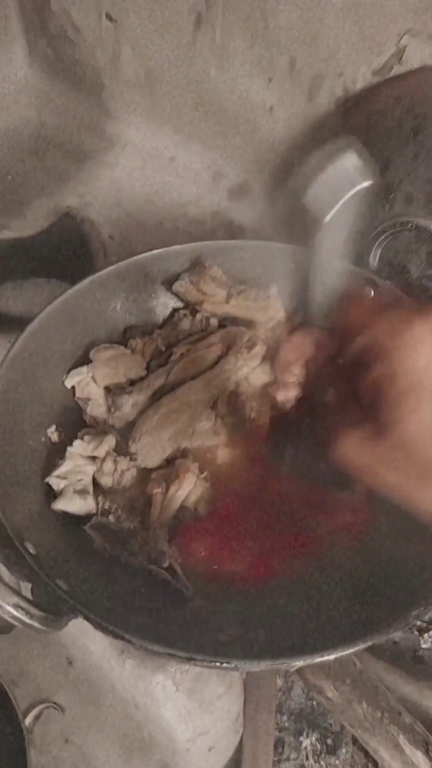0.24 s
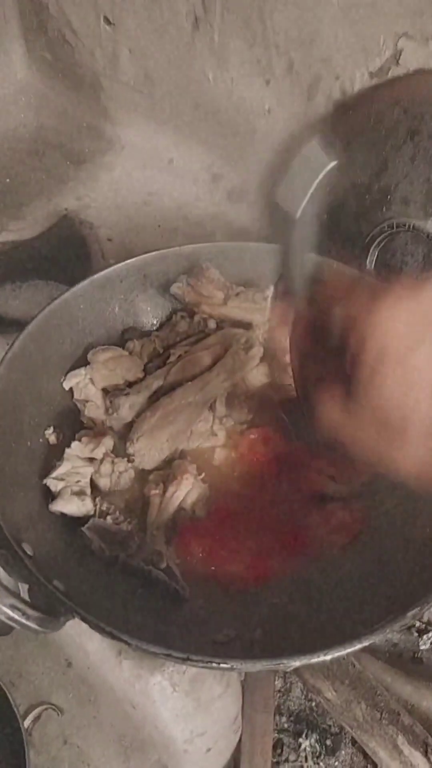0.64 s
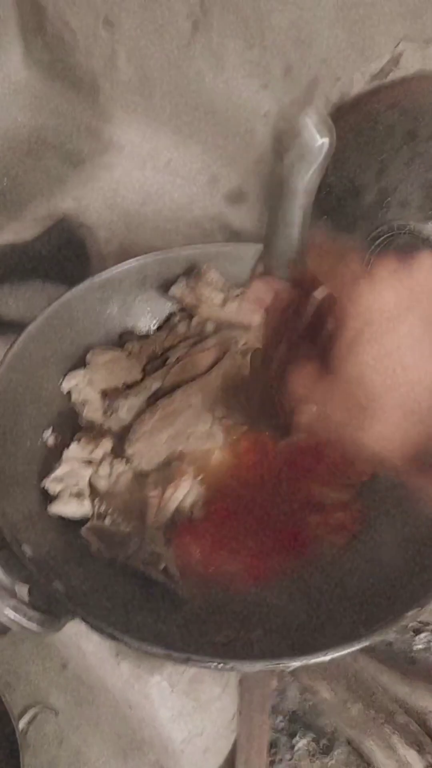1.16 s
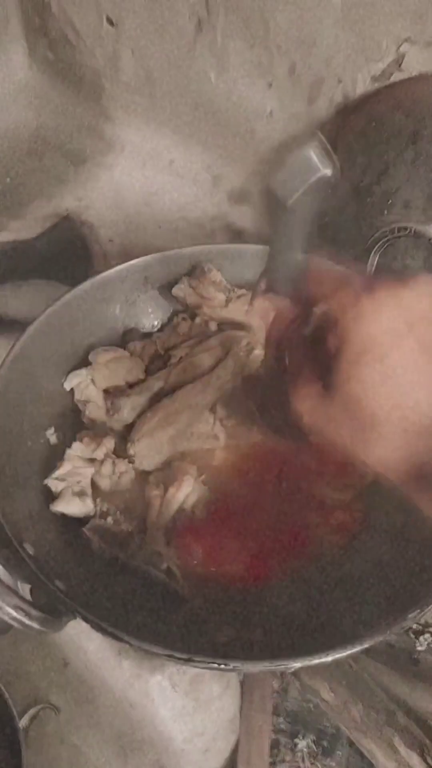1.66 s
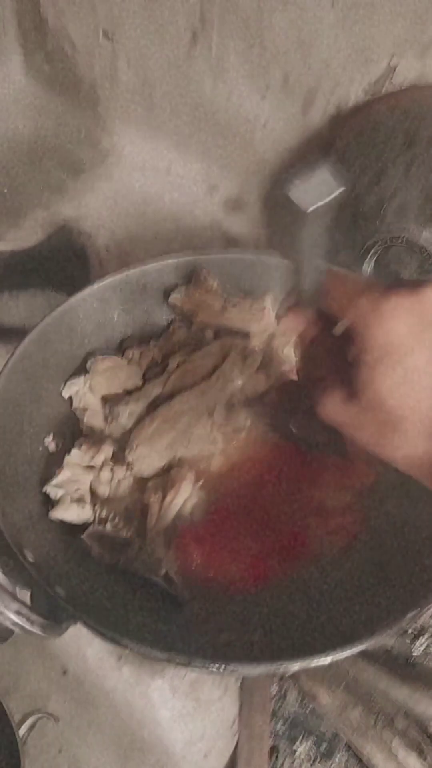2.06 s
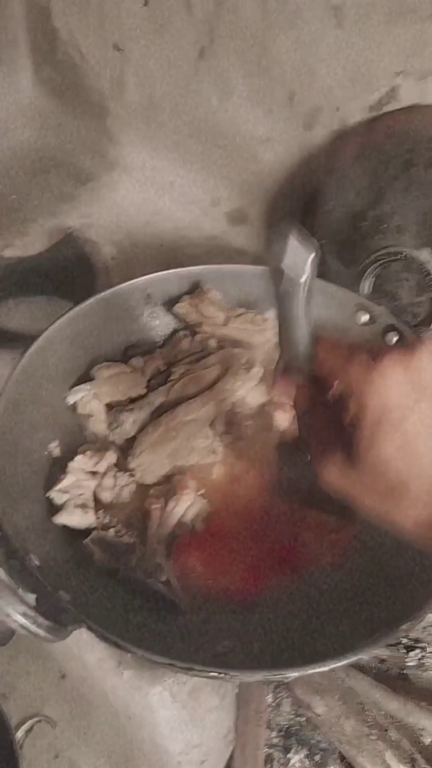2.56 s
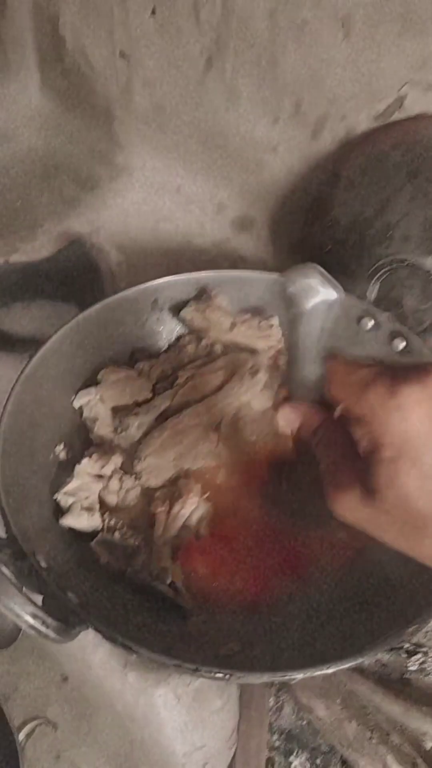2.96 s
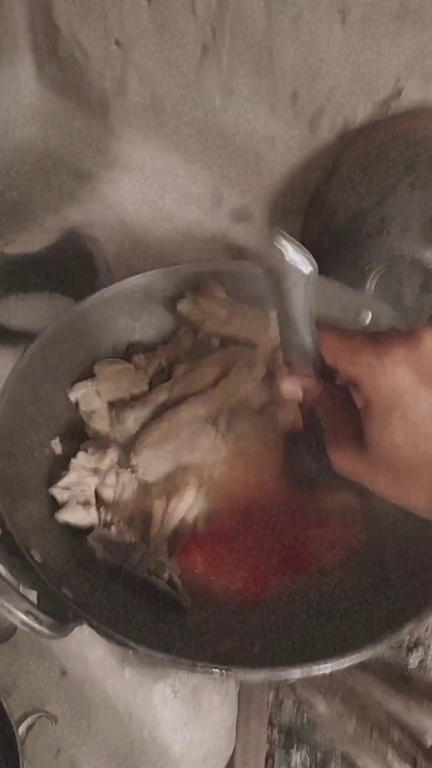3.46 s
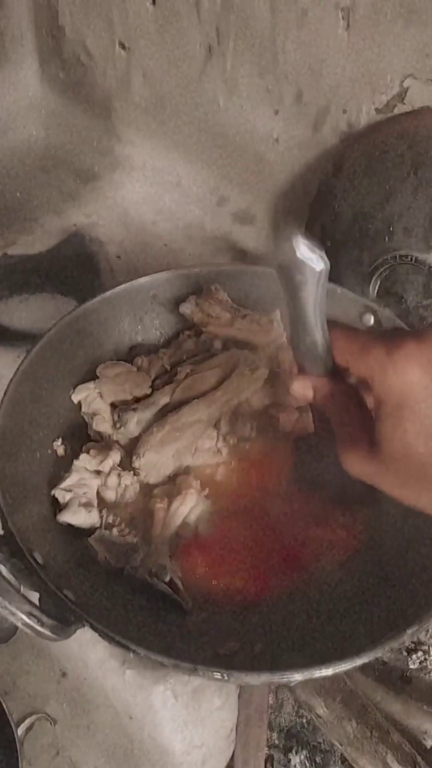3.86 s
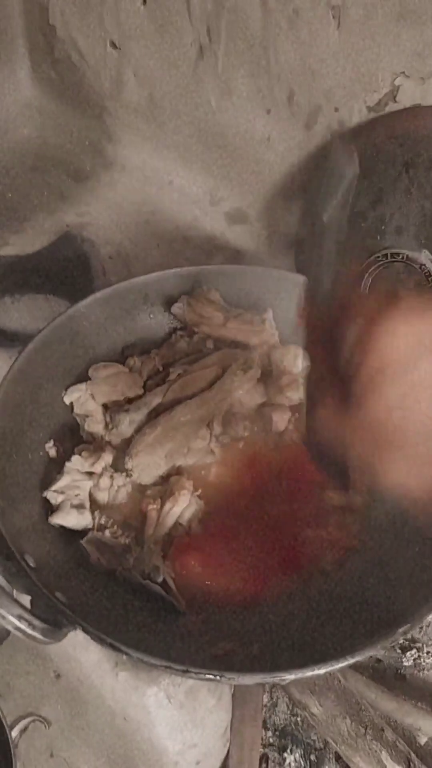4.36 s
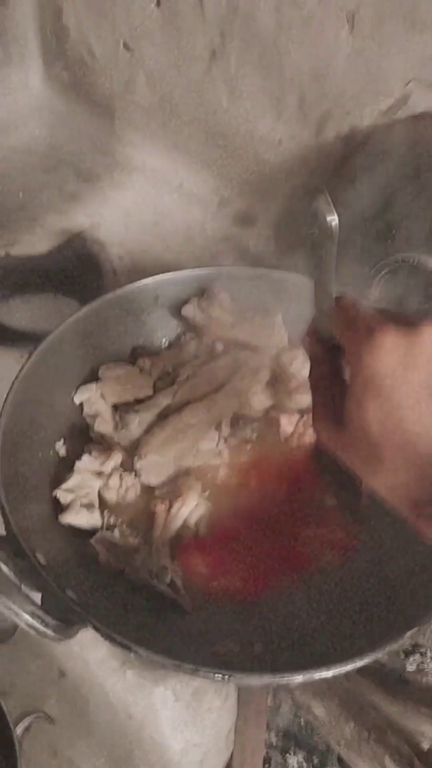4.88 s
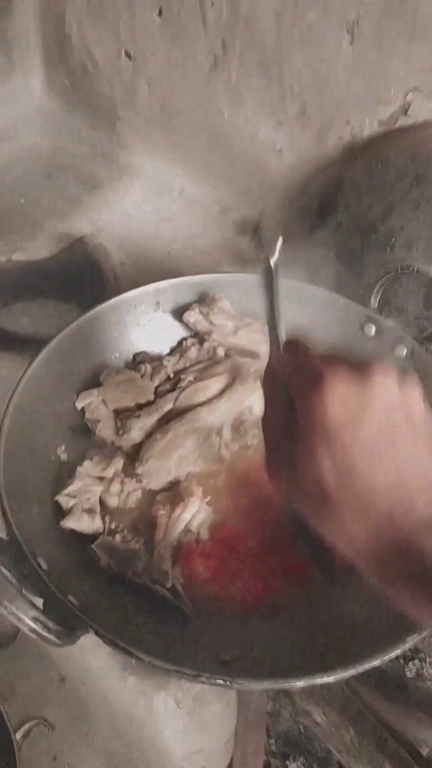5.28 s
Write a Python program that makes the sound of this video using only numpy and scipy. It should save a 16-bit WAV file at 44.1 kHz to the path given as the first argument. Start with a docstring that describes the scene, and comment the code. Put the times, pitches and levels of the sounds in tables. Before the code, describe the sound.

A steel spoon jabs through soft food onto the bottom of a metal pan, heard close up. Each jab is a dry click and a short, damped clank, leaving a thin metallic ring and a faint kitchen echo. Five jabs land between 0.2 and 1 second. After a half-second gap, they resume at 1.5 seconds and run steadily, about five a second, until 4.1 seconds, similar in strength but shifting in pitch. In the pause that follows, the lifted spoon gives one faint, very high ping at about 4.5 seconds. Three more jabs land at roughly 4.9, 5.0 and 5.3 seconds. Far beneath the knocks, a fine sizzle runs throughout, flaring slightly after each jab, with the soft, steady rumble of a wood fire. Simmering sauce makes tiny bubbles, with clearer blips around 1.3 and 1.8 seconds and during the pause.

```python
"""A steel spoon jabs again and again through soft food onto the bottom of a metal pan on a wood stove.
Each jab clicks, the loaded pan clanks and rocks a little, the sizzle flares,
and a faint ring hangs in the hard-walled kitchen. After four seconds the jabs pause and the lifted
spoon pings once; then three more jabs land. All along the sauce blips and simmers over the fire."""
import sys
import numpy as np
from scipy import signal
from scipy.fft import rfft, irfft
from scipy.io import wavfile

SR = 44100
rng = np.random.default_rng(int(sys.argv[2]) if len(sys.argv) > 2 else 0)


def inscribe(sig):
    """Save sig as 16-bit PCM at rate SR to the path in sys.argv[1].

    A 1-D sig is mono; a 2-D sig holds one channel per row.
    Samples are clipped to [-1, 1] before scaling.
    """
    pcm = np.round(np.clip(np.atleast_2d(sig).T, -1, 1) * 32767)
    wavfile.write(sys.argv[1], SR, pcm.astype(np.int16))


N = 243873
HIT_T = np.arange(int(.3 * SR)) / SR   # time axis of one hit, in seconds


# the jabs; trapped food cushions the hit, and the grip picks the note that rings out:
# t/s, strength/dB, cushioning/dB, note f/Hz
JABS = [(0.1532, 1, 0.5, 5030), (0.3797, 0.5, 0, 1837), (0.5846, 0, -0.5, 1800), (0.7817, 0, 1.5, 1963),
        (1.0262, 0.5, 3.5, 2614), (1.5317, 1.5, 3.5, 2540), (1.7877, -3, 3, 2860), (2.0073, -1.5, 1, 3560),
        (2.191, -0.5, -1.5, 4150), (2.394, 1.5, -0.5, 1956), (2.5731, -0.5, -0.5, 1885),
        (2.7487, 0, -0.5, 1880), (2.9232, -0.5, -1, 1807), (3.0956, -0.5, -0.5, 1836),
        (3.274, -2, -1.5, 4110), (3.4699, -2, 0, 1875), (3.685, 0, 0.5, 1950), (3.8729, 0, -0.5, 1943),
        (4.103, -1, -1, 1900), (4.8595, 0, -0.5, 3485), (5.031, -0.5, 2, 2910), (5.2569, -0.5, 0, 3800)]

def jabs(treble_lead_s=0.001002, bottoming_s=0.000887, lead_in_s=0.0037):
    """Every jab hits the same pan; short bending waves run fastest, so the clash leads the clank."""
    out = np.zeros(N)
    pan_grain = rng.standard_normal(len(HIT_T))
    for s, strength_db, cushion_db, note_hz in JABS:
        colour = jab_colour(strength_db, cushion_db)
        body_db = colour[0][1]   # the lowest register
        add(out, s - lead_in_s, bright_lead_in(colour))
        add(out, s - treble_lead_s, clash(pan_grain, colour))
        add(out, s + bottoming_s, snap(colour))
        metal = clank(colour, note_hz) + rim(colour) + grip_note(note_hz, strength_db)
        add(out, s, metal + thud(body_db) + rocking())
    return out


# the pan's registers under a jab: f/Hz, level/dB, gain per cushioning/(dB per dB)
JAB_EQ = [(387, 0.87, 0.47), (1100, -1.2, 0.93), (1950, -1.5, 0.7), (3050, -2.5, 0.99),
          (8200, -0.87, -1.15)]

def jab_colour(strength_db, cushion_db):
    """One jab's EQ curve: strength lifts every register, cushioning trades edge for body."""
    return [(hz, level_db + strength_db + slope * cushion_db) for hz, level_db, slope in JAB_EQ]


# the pan's strong modes, damped by the food: f/Hz, level/dB, t60/s
PAN_MODES = [(272.5, -35, 0.16), (334.3, -21, 0.061), (421.8, -44, 0.26), (501, -24, 0.05),
             (526.8, -30, 0.12), (577, -30, 0.11), (708, -19.5, 0.0087), (768.4, -27.5, 0.053),
             (880, -35, 0.13), (1045.6, -25.5, 0.069), (1218, -29, 0.11), (1190, -35.5, 0.076),
             (1378, -37, 0.097), (1600, -36, 0.021), (1920, -44, 0.015), (1875, -12.5, 0.035),
             (2077, -13.5, 0.015), (2164, -23, 0.086), (2590, -40.5, 0.11), (2745, -23.5, 0.057),
             (2940, -29.5, 0.14), (2870, -27, 0.057), (3330, -34, 0.051), (3300, -42, 0.31),
             (3970, -34.5, 0.15), (4060, -21, 0.082), (4116, -28.5, 0.064), (4630, -25, 0.099),
             (4780, -17.5, 0.014), (8530, -18.5, 0.025)]

def clank(colour, note_hz, trim_db=-1.5, low_cut_hz=190,
          main_hz=1830, main_width_hz=160, mute_db=-4, mute_above_hz=2300):
    """The body of the hit: the loaded pan rings short, with little deep bass."""
    hz, level_db, t60 = np.transpose(PAN_MODES)
    spot, load = rng.standard_normal((2, len(hz)))
    spot_db = 3 * np.minimum(hz / 2500, 1) * spot   # higher modes depend more on the spot that is hit
    high_grip = note_hz > mute_above_hz   # the grip for a high note mutes the main mode
    grip_db = mute_db * high_grip * np.exp(-((hz - main_hz) / main_width_hz) ** 2)
    detuned = np.column_stack([hz * (1 + .005 * load), level_db, t60])   # by the weight of the hand
    body = ring(detuned, gain_at(colour, hz) * from_db(trim_db + spot_db + grip_db))
    return butter(body, 3, low_cut_hz, "high")


# the spectrum of the many weak modes of pan and spoon: f/Hz, level/dB
CLASH_EQ = [(60, -3.5), (180, -4), (400, 13), (900, 9), (2000, 14.5), (2450, 10), (3000, 17.5), (4800, 15),
            (5800, 10), (8000, 15.5), (9600, 15.5), (10600, 5), (13500, -10.5)]

def clash(pan_grain, colour, shared=0.55, t60=0.11, crack=1.35, crack_t60=0.014, rise_s=0.0023):
    """Weak modes blur into a burst, partly alike at every jab, led by the crack of steel on metal."""
    grain = np.sqrt(shared) * pan_grain + np.sqrt(1 - shared) * rng.standard_normal(len(HIT_T))
    attack = 1 - np.exp(-(HIT_T / rise_s) ** 2)
    envelope = attack * (decay(HIT_T, t60) + crack * decay(HIT_T, crack_t60))
    return coloured(coloured(grain, CLASH_EQ), colour) * envelope / np.linalg.norm(envelope)


def snap(colour, level_db=-7, t60=0.0029, band_hz=(600, 9000)):
    """The transient: a dry click as the spoon's edge bottoms out."""
    click = coloured(rng.standard_normal(len(HIT_T)), colour) * decay(HIT_T, t60)
    return from_db(level_db) * butter(click, 2, band_hz, "band")


def bright_lead_in(colour, level_db=-30, peak_s=0.0037, band_hz=(3000, 10000)):
    """A faint, bright puff of noise just before each hit."""
    puff = coloured(rng.standard_normal(len(HIT_T)), colour) * swell(HIT_T, peak_s) ** 2
    return from_db(level_db) * butter(puff, 2, band_hz, "band")


def grip_note(hz, strength_db, level_db=-24, t60=0.073):
    """Spoon and pan, pressed together, favour one note that changes with the grip."""
    return ring([(hz, level_db + strength_db, t60)], np.ones(1))


# the modes of the bare rim, clear of the food: f/Hz, level/dB, t60/s
RIM_MODES = [(3120, -60, 0.31), (3390, -54, 0.43), (4250, -51, 0.35), (4680, -62, .45), (5300, -55, 0.54)]

def rim(colour):
    """The tail of the hit: the rim rings on, thin and metallic, in a new balance at every jab."""
    hz = np.array(RIM_MODES)[:, 0]
    scatter_db = 3.5 * rng.standard_normal(len(hz)) - 1
    return ring(RIM_MODES, gain_at(colour, hz) * from_db(scatter_db))


def thud(body_db, pan_hz=180, pan_db=-47, pan_peak_s=0.0066,
         stove_hz=28, stove_db=-54, stove_peak_s=0.035):
    """The low end: the soft push through the food swells and dies in the pan and the stove beneath."""
    pan = np.sin(2 * np.pi * pan_hz * HIT_T) * swell(HIT_T, pan_peak_s) ** 2
    stove = np.sin(2 * np.pi * stove_hz * HIT_T) * swell(HIT_T, stove_peak_s) ** 2
    return from_db(2 * body_db + pan_db) * pan + from_db(body_db + stove_db) * stove


def rocking(start_hz=185, fall_s=0.128, peak_s=0.034, width_s=0.074, level_db=-56, scatter_db=3.5):
    """The pan rocks on its seat with a faint tone that sinks as the pressure lets go."""
    hz = start_hz * np.exp(-HIT_T / fall_s) * (1 + 0.03 * rng.standard_normal())
    envelope = np.exp(-((HIT_T - peak_s) / width_s) ** 2)
    gain = from_db(level_db - scatter_db * rng.standard_normal())
    return gain * envelope * np.sin(2 * np.pi * np.cumsum(hz) / SR)


# the modes of the free spoon: f/Hz, level/dB, t60/s
SPOON_MODES = [(10120, 5, 0.053), (10250, 3, 0.054), (10500, -3, 0.06), (12300, -2, 0.12),
               (12010, -9, 0.089)]

def spoon_ping(at_s=4.517, level_db=-28.5, brush_t60=0.16, attack_s=0.0068):
    """Free of the food, the spoon is set ringing high and thin by a short rough brush."""
    out = np.zeros(N)
    brush = rng.standard_normal(len(HIT_T)) * decay(HIT_T, brush_t60) * (1 - np.exp(-HIT_T / attack_s))
    steel = ring(SPOON_MODES, np.ones(len(SPOON_MODES)))
    add(out, at_s, from_db(level_db) * signal.fftconvolve(brush / np.linalg.norm(brush), steel))
    return out


# the featured blips of the sauce: t/s, level/dB, f/Hz
SAUCE_BLIPS = [(1.274, -39.5, 1120), (1.285, -39.5, 1820), (1.763, -36.5, 1190), (4.344, -45, 1970),
               (4.483, -42, 2150), (4.726, -44, 1710)]

def sauce(blip_trim_db=0.5, simmer_db=-50, simmer_hz=1900, spread_octaves=0.37, count=110):
    """A few clear blips stand out from a bed of small simmering bubbles."""
    out = np.zeros(N)
    for s, level_db, hz in SAUCE_BLIPS:
        add(out, s, from_db(level_db + blip_trim_db) * bubble(hz))
    times = rng.uniform(0, (N - 1) / SR, count)
    gains = from_db(simmer_db) * rng.uniform(0, 2, count)
    pitches = simmer_hz * 2 ** (spread_octaves * rng.standard_normal(count))
    for s, gain, hz in zip(times, gains, pitches):
        add(out, s, gain * bubble(hz))
    return out


def bubble(hz, ring_cycles=12, puff_t60=0.081):
    """A bubble in thick sauce tears open with a rough puff that its cavity colours; peak 1."""
    t = HIT_T[:len(HIT_T) // 4]
    puff = rng.standard_normal(len(t)) * decay(t, puff_t60)
    cavity = np.sin(2 * np.pi * hz * t) * decay(t, ring_cycles / hz)
    blip = signal.fftconvolve(puff, cavity)
    return blip / np.abs(blip).max()


# the spectrum of juices frying on hot metal: f/Hz, relative level/dB
SIZZLE_EQ = [(1500, 0.5), (2800, -1), (4200, -5), (6000, -5.5), (9300, -1), (10800, -9), (14000, -37)]

def sizzle(pops_per_s=6000, hiss_db=-58, flare_db=-62, flare_peak_s=0.059):
    """Tiny pops merge into a hiss that flares as a jab spreads juice, more so as more food is crushed."""
    power = np.full(N, from_db(hiss_db) ** 2)
    for s, strength_db, cushion_db, _ in JABS:
        age_s = np.maximum(np.arange(N) / SR - s, 0)
        crush_db = (strength_db + cushion_db) / 2
        power += (from_db(flare_db + crush_db) * swell(age_s, flare_peak_s)) ** 2
    pops = rng.standard_normal(N) * (rng.random(N) < pops_per_s / SR)
    hiss = coloured(pops, SIZZLE_EQ)
    return np.sqrt(power) * hiss / hiss.std()


# the spectrum of the wood fire: f/Hz, relative level/dB
FIRE_EQ = [(20, 5), (60, -1.5), (110, -7.5), (250, 0), (350, -3), (600, -5), (1300, -12), (2100, -7),
           (2700, -54), (6000, -41), (14000, -34)]

def fire(level_db=-57.5):
    """The fire lays a soft, steady rumble under the pan."""
    rumble = coloured(rng.standard_normal(N), FIRE_EQ)
    return from_db(level_db) * rumble / rumble.std()


# the tone of the kitchen's reverb: f/Hz, level/dB
REVERB_EQ = [(100, -19), (300, -18), (600, -23.5), (1000, -28), (2000, -28.5), (3400, -22), (4500, -20.5),
             (6000, -21), (9500, -21.5), (12500, -26)]

def kitchen(x, t60=0.43, build_s=0.1):
    """A faint tail follows each hit: it rises slowly for about a tenth of a second, then dies away."""
    t = np.arange(SR) / SR
    envelope = decay(t, t60) * (1 - np.exp(-t / build_s))
    tail = coloured(rng.standard_normal(SR), REVERB_EQ) * envelope / np.linalg.norm(envelope)
    return signal.fftconvolve(x, tail)[:N]


def widen(x, above_hz=4400, spread_t60=0.024, side_db=-15):
    """Scattered early reflections spread the treble in stereo; the rest stays in the centre."""
    envelope = decay(HIT_T, spread_t60)
    reflections = rng.standard_normal(len(HIT_T)) * envelope / np.linalg.norm(envelope)
    treble = butter(x, 8, above_hz, "high")
    side = from_db(side_db) * signal.fftconvolve(treble, reflections)[:N]
    return np.array([x + side, x - side])


def ring(modes, gains, contact_s=0.00095, travel_at_1khz_s=0.00077):
    """Struck modes as decaying sines; a bending wave's travel time falls with the root of frequency."""
    hz, level_db, t60 = np.transpose(modes)[:, :, None]
    t = np.maximum(HIT_T - travel_at_1khz_s * np.sqrt(1000 / hz), 0)
    envelope = decay(t, t60) * (1 - np.exp(-t / contact_s))
    return gains @ (from_db(level_db) * np.sin(2 * np.pi * hz * t) * envelope)


def decay(t, t60):
    """Exponential fade, 60 dB down after t60."""
    return np.exp(-np.log(1000) * t / t60)


def swell(t, peak_s):
    """An envelope that rises to 1 at peak_s and dies away."""
    return t / peak_s * np.exp(1 - t / peak_s)


def from_db(db):
    """Decibels to gain."""
    return 10 ** (np.asarray(db) / 20)


def gain_at(curve, hz):
    """Gain of an EQ curve (f/Hz, level/dB), joined on a log-frequency axis."""
    curve_hz, level_db = np.transpose(curve)
    return from_db(np.interp(np.log(np.maximum(hz, 1)), np.log(curve_hz), level_db))


def coloured(x, curve):
    """Shape a noise with an EQ curve."""
    return irfft(rfft(x) * gain_at(curve, np.fft.rfftfreq(len(x), 1 / SR)), len(x))


def butter(x, order, hz, kind):
    """A filter with a flat passband."""
    return signal.sosfilt(signal.butter(order, hz, kind, fs=SR, output="sos"), x)


def add(track, s, sound):
    """Mix a sound into a track at time s."""
    start = round(s * SR)
    track[start:start + len(sound)] += sound[:N - start]


def scene():
    """Pan, spoon and sauce up close, the kitchen around them, sizzle and fire as the bed."""
    near = jabs() + spoon_ping() + sauce()
    return widen(near) + kitchen(near) + sizzle() + fire()


def record(dry):
    """A steep high cut at 13.9 kHz takes the air off the top."""
    return signal.sosfilt(signal.ellip(8, .3, 70, 13900, fs=SR, output="sos"), dry)


dry = scene()
out = record(dry)
inscribe(out)
```